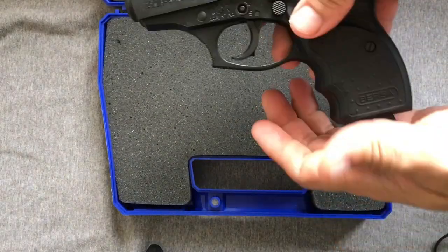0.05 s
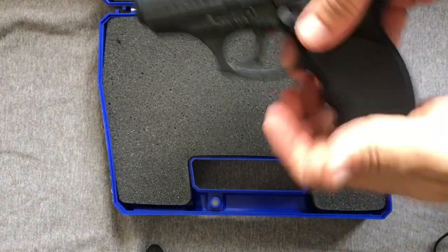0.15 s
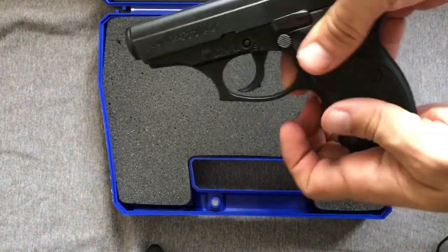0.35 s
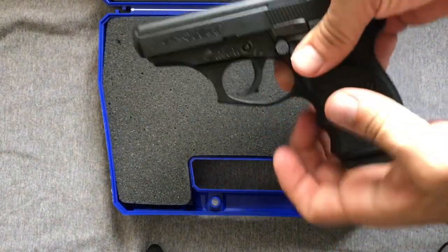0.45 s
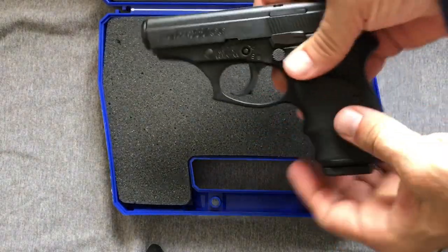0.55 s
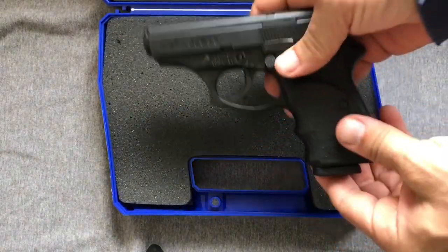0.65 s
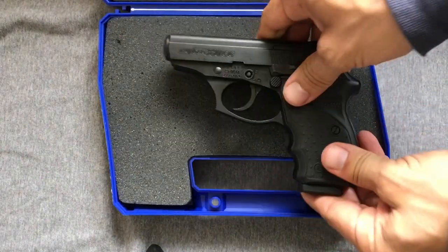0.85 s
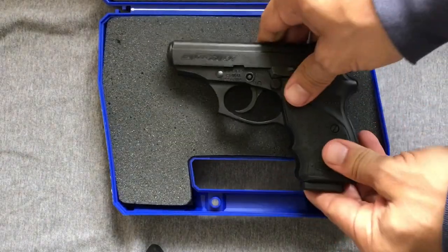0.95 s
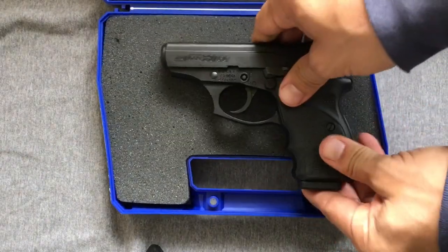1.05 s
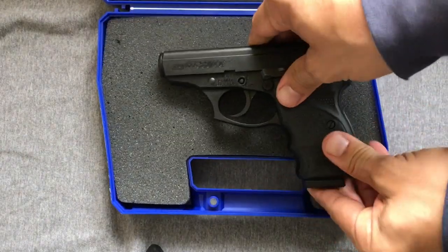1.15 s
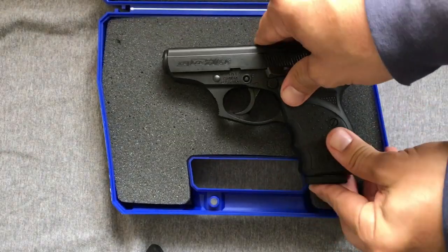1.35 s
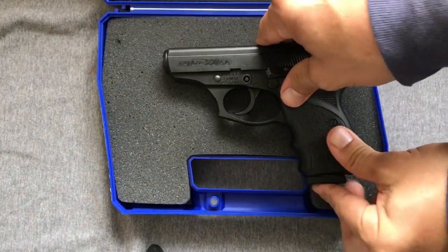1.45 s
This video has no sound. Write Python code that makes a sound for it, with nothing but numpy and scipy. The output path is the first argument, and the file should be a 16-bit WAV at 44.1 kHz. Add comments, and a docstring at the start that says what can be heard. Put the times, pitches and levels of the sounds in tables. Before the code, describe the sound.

A steel pistol magazine scrapes briefly, snaps home with a loud bright double clack, then gets a duller knock on its base; soft bumps and sleeve rustle follow, close to the microphone in a small furnished room.

```python
"""Pistol handling, close up

A steel pistol is handled close to the microphone in a small furnished room.
The magazine scrapes (friction noise), snaps home with a loud double clack (noise bursts, ringing modes),
and the palm gives its base a duller knock. Then the hold shifts: soft bumps (pressure pulses),
small ticks, skin and sleeve rustle (random slips), and slow puffs of air (low-band noise)."""
import sys
import numpy as np
from scipy import signal
from scipy.fft import rfft, irfft
from scipy.io import wavfile

SR = 44100
rng = np.random.default_rng(int(sys.argv[2]) if len(sys.argv) > 2 else 0)


def store_pcm(level_fs):
    """Save levels as 16-bit WAV."""
    pcm = np.round(np.clip(level_fs, -1, 1) * 32767).astype(np.int16)
    wavfile.write(sys.argv[1], SR, np.atleast_2d(pcm).T)


N = 66150
TIME_S = np.arange(N) / SR

# hard contacts in the gun: start_s, steel_clack_db, grip_knock_db
CONTACTS = [(0.001, -38, -45.5), (0.008, -36, -51), (0.023, -46, -54), (0.2169, -28.5, -50),
            (0.2248, -16.5, -51), (0.2273, -3.5, -49), (0.2288, -1.5, -50), (0.2322, -18, -40),
            (0.2376, 1.5, -21.5), (0.2405, -24, -19), (0.4189, -43, -22.5), (0.422, -35.5, -36.5),
            (0.4289, -61.5, -30.5), (0.4367, -39.5, -33), (0.477, -62.5, -44), (0.55, -52, -60.5),
            (0.668, -59, -60), (0.7509, -70, -45.5), (0.983, -71, -47.5), (1.015, -66, -51.5),
            (1.133, -68, -45.5), (1.4773, -42, -45.5), (1.485, -54.5, -51)]
# short dense ring of the steel parts: freq_hz, relative_db_per_hz
STEEL_SPECTRUM = [(150, -35.5), (650, -37), (830, -17.5), (1150, -18.5), (1700, -12.5), (2050, -9),
                  (2300, -12), (2950, 0), (3600, -9), (4150, 1.5), (4800, -4.5), (5950, 1.5), (6600, -9),
                  (7250, -5.5), (8000, -14), (9300, -17.5), (10500, -26), (15500, -32)]
# short dense ring of the grip: freq_hz, relative_db_per_hz
GRIP_SPECTRUM = [(150, -8.5), (400, -11.5), (650, -10.5), (900, -5), (1200, -0.5), (1550, 0.5), (2100, -12),
                 (3000, -12.5), (5000, -20.5), (9000, -36.5), (15000, -47)]
# sharp crack on top of the clack: freq_hz, relative_db_per_hz
CRACK_SPECTRUM = [(4000, -29), (7500, -9.5), (8400, 3.5), (8800, -5.5), (9300, 2.5), (10300, -6.5),
                  (11400, -1.5), (12000, -11), (15500, -8)]
STEEL_T60_S, GRIP_T60_S, CRACK_T60_S, CONTACT_RISE_S = 0.023, 0.03, 0.018, 0.00047
CRACK_OFFSET_DB, CRACK_DB_PER_CLACK_DB = -7, 2.2

# lasting modes of frame and magazine: freq_hz, relative_db, t60_s
MODES = [(827, -10, .28), (1150, -12.5, 0.24), (1463, -9, 0.23), (2035, -8.5, 0.17), (2852, -4, .19),
         (3160, -3.5, .16), (4070, -2, .18), (4315, -2.5, .18), (4588, -4.5, .27), (4982, -8, 0.3),
         (5250, -5.5, .26), (5290, -5, 0.23), (5425, -3.5, 0.31), (5845, -4.5, 0.12), (6019, 0.5, .18),
         (6156, -3.5, .2), (7100, -3.5, .15), (9500, -12.5, .15)]
MODES_RE_CLACK_DB = -27.5

# bright scraping: magazine in its well, later a sleeve swish and faint hiss around small ticks:
# time_s, level_db
SCRAPE_LEVEL = [(0, -33), (0.025, -44.5), (0.06, -54), (0.11, -71), (0.49, -79.5), (0.55, -64), (0.61, -84),
                (1.05, -73), (1.16, -59.5), (1.23, -62), (1.27, -71.5), (1.46, -72), (1.5, -53.5)]
# bright scraping colour: freq_hz, relative_db_per_hz
SCRAPE_SPECTRUM = [(300, -14.5), (900, -8), (1400, 1.5), (2000, 0), (3500, -0.5), (5700, -0.5), (6700, -17),
                   (15000, -26)]

# hand bumps and quick finger taps: start_s, peak_db, time_to_peak_s
BUMPS = [(0.185, -34, 0.0022), (0.206, -29, 0.0058), (0.239, -19, 0.0044), (0.3, -25.5, 0.003),
         (0.4202, -19.5, 0.0028), (0.475, -28.5, 0.0064), (0.532, -26, 0.015), (0.739, -38.5, 0.00028),
         (0.742, -30.5, 0.0058), (0.752, -31.5, 0.00024), (0.811, -38.5, 0.0023), (0.9579, -24.5, .0035),
         (1.1306, -24, 0.0075), (1.39, -33.5, 0.0093)]
# pat of skin in each bump: freq_hz, relative_db_per_hz
PAT_SPECTRUM = [(60, -3), (130, 2.5), (300, -5.5), (450, -8.5), (700, -12.5), (1500, -21.5), (5000, -43.5)]
PAT_RE_BUMP_DB = -19.5

# palm rubbing along the grip, hardest while pushing: time_s, level_db
PALM_LEVEL = [(0.175, -62.5), (0.187, -41), (0.205, -40.5), (0.225, -43), (0.27, -40.5), (0.31, -37.5),
              (0.335, -69), (0.39, -66), (0.46, -53), (0.55, -55.5), (0.66, -69), (0.73, -65),
              (0.748, -42.5), (0.77, -56.5), (0.83, -54.5), (0.93, -57), (1.02, -47.5), (1.07, -64.5)]
# palm rub colour: freq_hz, relative_db_per_hz
PALM_SPECTRUM = [(40, -0.5), (130, -2), (300, -4), (450, -9), (650, -15), (1200, -19.5), (3000, -34),
                 (10000, -54)]
# skin and sleeve rustle: time_s, level_db
RUSTLE_LEVEL = [(0.1, -67), (0.47, -55), (0.56, -53), (0.63, -62), (0.75, -55.5), (0.78, -62),
                (0.82, -56.5), (0.92, -58), (1.015, -50.5), (1.07, -56), (1.19, -55.5), (1.25, -58),
                (1.285, -56.5), (1.32, -55.5), (1.44, -58), (1.5, -48)]
# rustle colour: freq_hz, relative_db_per_hz
RUSTLE_SPECTRUM = [(80, 5), (280, 3.5), (600, 1), (1100, -1.5), (1800, -1.5), (3200, -10), (6000, -18),
                   (9000, -24), (15000, -28)]

# stirred air on the microphone: time_s, level_db
AIR_LEVEL = [(0, -27), (0.17, -33), (0.25, -23), (0.4, -20), (0.5, -25), (0.66, -39.5), (0.85, -36),
             (1.1, -34), (1.3, -41.5), (1.5, -40)]
AIR_HZ = 12

# decay of the room echo: freq_hz, t60_s
ROOM_T60 = [(200, 0.4), (1200, 0.21), (3500, 0.2), (6000, 0.2), (12000, 0.18)]
# colour of the room echo: freq_hz, relative_db
ROOM_GAIN = [(200, 0.5), (1000, 1.5), (2500, -1.5), (5500, -4.5), (12000, -1.5)]
ROOM_BANDS_HZ = 125 * 2 ** np.arange(8)
ROOM_DB, ROOM_DELAY_S, ROOM_BUILD_S = -9, 0.001, 0.0029

# steady room tone: freq_hz, relative_db_per_hz
ROOM_TONE_SPECTRUM = [(30, -1), (70, -6), (150, -17.5), (400, -22), (650, -19.5), (1100, -16),
                      (2000, -23.5), (3500, -32), (6000, -41), (10000, -44), (15500, -47)]
ROOM_TONE_DB = -52.5

OVERLOAD_AMPLITUDE, CUTOFF_HZ = 0.9, 15800


def from_db(db):
    """Decibels to amplitude gain."""
    return 10 ** (np.asarray(db) / 20)


def rms_one(x):
    """Scale to unit power."""
    return x / np.sqrt(np.mean(x ** 2) + 1e-20)


def at_hz(points, hz):
    """Read a table on a log-frequency axis."""
    freq_hz, value = np.transpose(points)
    return np.interp(np.log(hz), np.log(freq_hz), value)


def level(points):
    """Gain over time from time_s, level_db points."""
    return from_db(np.interp(TIME_S, *np.transpose(points)))


def fade(age_s, t60_s):
    """Gain of a free decay: 60 dB down after t60_s."""
    return from_db(-60 * age_s / t60_s)


def add(out, start_s, sound):
    """Mix a sound in from start_s on."""
    start = int(np.clip(start_s * SR, 0, N - 1))
    out[start:start + len(sound)] += sound[:N - start]


def colour(spectrum, white):
    """Give a steady white signal a spectrum; rms 1."""
    hz = np.fft.rfftfreq(N, 1 / SR)[1:]
    gain = np.append(0, from_db(at_hz(spectrum, hz)))  # no DC
    return rms_one(irfft(rfft(white) * gain, N))


def noise(spectrum):
    """Smooth noise with a spectrum."""
    return colour(spectrum, rng.standard_normal(N))


def friction(spectrum, slips_per_s, spread_db):
    """Many tiny slips at random times, of uneven size and random sign."""
    size_db = spread_db * np.minimum(rng.exponential(1, N), 4)
    slips = from_db(size_db) * rng.choice([-1, 1], N)
    happens = rng.random(N) < slips_per_s / SR
    return colour(spectrum, slips * happens)


def blows(starts_s, levels_db, t60_s):
    """Envelope of blows that rise fast and die away; their powers add."""
    age_s = TIME_S[:SR // 10]
    shape = (1 - np.exp(-age_s / CONTACT_RISE_S)) * fade(age_s, t60_s)
    power = np.zeros(N)
    for start_s, level_db in zip(starts_s, levels_db):
        add(power, start_s, (from_db(level_db) * shape) ** 2)
    return np.sqrt(power)


def clacks():
    """Each contact: bright steel clack, dull grip knock, and a crack that grows faster with force."""
    starts_s, steel_db, grip_db = np.transpose(CONTACTS)
    crack_db = CRACK_OFFSET_DB + CRACK_DB_PER_CLACK_DB * steel_db
    steel = blows(starts_s, steel_db, STEEL_T60_S) * noise(STEEL_SPECTRUM)
    crack = blows(starts_s, crack_db, CRACK_T60_S) * noise(CRACK_SPECTRUM)
    grip = blows(starts_s, grip_db, GRIP_T60_S) * noise(GRIP_SPECTRUM)
    return steel + crack + grip


def frame_ring():
    """Every contact feeds energy to the lasting modes, which then die freely."""
    energy, ring = np.zeros(N), np.zeros(N)
    for start_s, steel_db, _ in CONTACTS:
        add(energy, start_s, from_db([steel_db]) ** 2)
    for freq_hz, mode_db, t60_s in MODES:
        energy_kept = fade(1 / SR, t60_s) ** 2  # per sample
        swing = np.sqrt(signal.lfilter([1], [1, -energy_kept], energy))
        tone = np.sin(2 * np.pi * (freq_hz * TIME_S + rng.random()))
        ring += from_db(MODES_RE_CLACK_DB + mode_db) * swing * tone
    return ring


def bright_scraping():
    """Dense little catches: magazine scrape, then sleeve swish and faint hiss around small ticks."""
    return level(SCRAPE_LEVEL) * friction(SCRAPE_SPECTRUM, slips_per_s=2500, spread_db=1)


def bumps():
    """Flesh meets the gun: one smooth push of pressure with a faint pat on it."""
    push = np.zeros(N)
    for start_s, peak_db, peak_s in BUMPS:
        age = TIME_S[:SR // 10] / peak_s  # 1 at the peak
        add(push, start_s, from_db(peak_db) * (age * np.exp(1 - age)) ** 2)
    return push * (1 + from_db(PAT_RE_BUMP_DB) * noise(PAT_SPECTRUM))


def palm_rub():
    """The pushing palm slips along the grip in uneven catches."""
    return level(PALM_LEVEL) * friction(PALM_SPECTRUM, slips_per_s=900, spread_db=3.0)


def rustle():
    """Skin and sleeve rub in many light slips."""
    return level(RUSTLE_LEVEL) * friction(RUSTLE_SPECTRUM, slips_per_s=1900, spread_db=3.0)


def air():
    """Moving hands push slow swells of air at the microphone."""
    band_hz = [AIR_HZ / 2, AIR_HZ * 1.3]
    band = signal.butter(2, band_hz, "band", fs=SR, output="sos")
    swell = signal.sosfilt(band, rng.standard_normal(2 * N))
    return level(AIR_LEVEL) * rms_one(swell[N:])  # first half lets the filter settle


def room(x):
    """A short diffuse tail that builds within milliseconds and dies sooner in the treble."""
    age_s = np.maximum(TIME_S[:SR // 2] - ROOM_DELAY_S, 0)
    tail = np.zeros(len(age_s))
    for hz in ROOM_BANDS_HZ:
        edges_hz = [hz / np.sqrt(2), min(hz * np.sqrt(2), 0.45 * SR)]
        octave = signal.butter(2, edges_hz, "band", fs=SR, output="sos")
        diffuse = signal.sosfilt(octave, rng.standard_normal(len(age_s)))
        tail += from_db(at_hz(ROOM_GAIN, hz)) * fade(age_s, at_hz(ROOM_T60, hz)) * diffuse
    tail *= 1 - np.exp(-age_s / ROOM_BUILD_S)
    tail /= np.sqrt(np.sum(tail ** 2))  # unit energy
    return from_db(ROOM_DB) * signal.fftconvolve(x, tail)[:N]


def room_tone():
    """Steady low-weighted noise of the room."""
    return from_db(ROOM_TONE_DB) * noise(ROOM_TONE_SPECTRUM)


def scene():
    """The gun, the room echo of clacks and bright scraping, the hands, stirred air and room tone."""
    bright = clacks() + bright_scraping()
    gun = bright + room(bright) + frame_ring()
    hands = bumps() + palm_rub() + rustle()
    return (gun + hands + air() + room_tone())[None]


def record(dry):
    """The loudest clacks overload the microphone (tanh); the top is cut."""
    low_pass = signal.ellip(16, 0.1, 90, CUTOFF_HZ, fs=SR, output="sos")
    overloaded = OVERLOAD_AMPLITUDE * np.tanh(dry / OVERLOAD_AMPLITUDE)
    return signal.sosfilt(low_pass, overloaded)


dry = scene()
out = record(dry)
store_pcm(out)
```